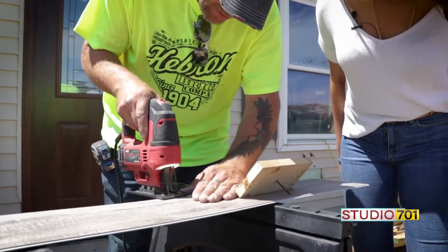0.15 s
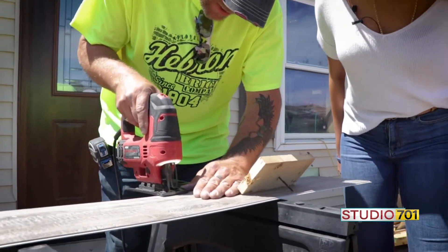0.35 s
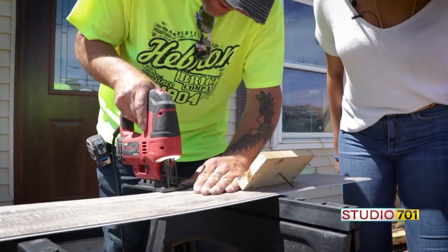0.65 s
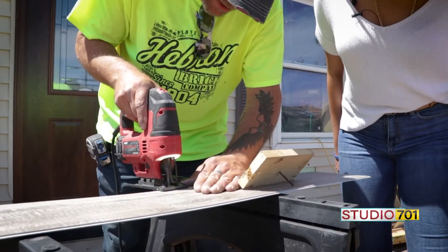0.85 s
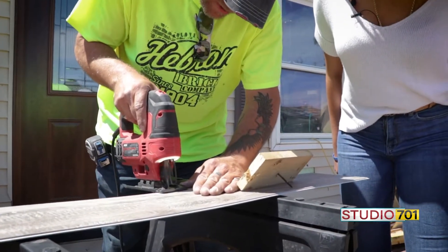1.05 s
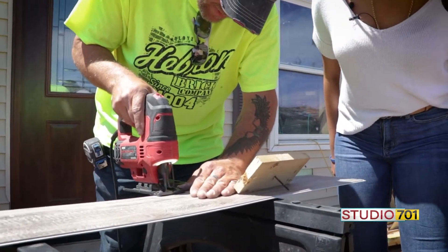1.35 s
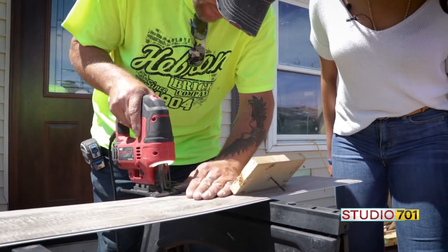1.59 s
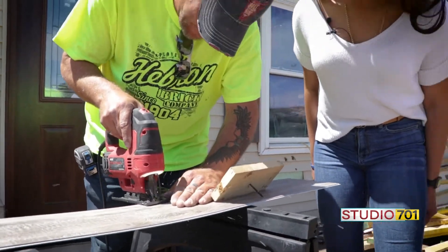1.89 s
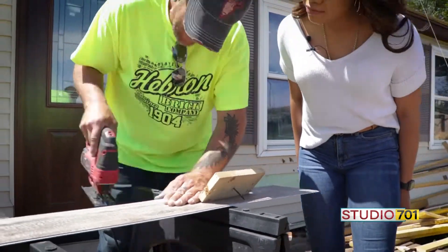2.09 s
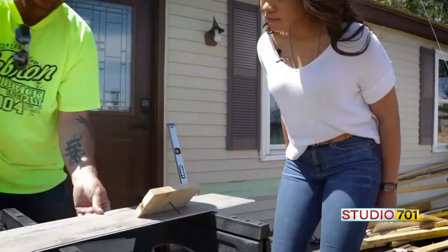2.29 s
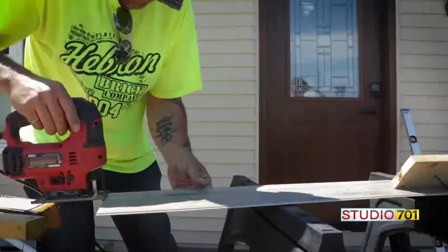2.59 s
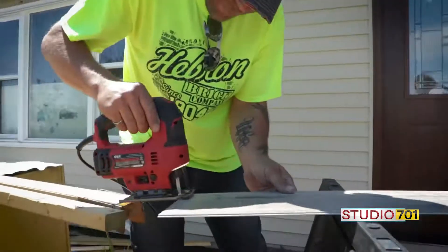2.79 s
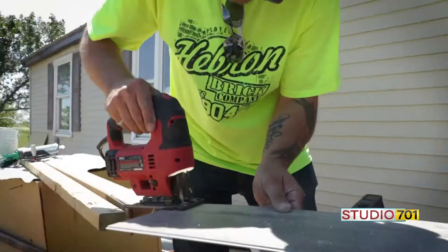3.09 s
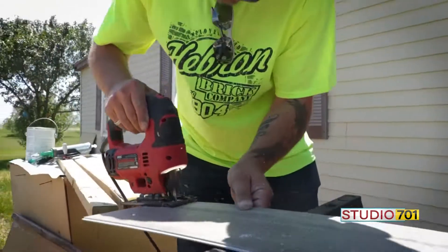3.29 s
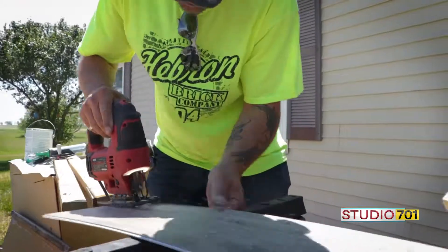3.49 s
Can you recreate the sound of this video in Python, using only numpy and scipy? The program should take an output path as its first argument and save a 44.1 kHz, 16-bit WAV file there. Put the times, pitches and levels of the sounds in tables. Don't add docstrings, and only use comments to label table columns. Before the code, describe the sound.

A jigsaw quickly gains speed and bites into a vinyl plank outdoors, a harsh chattering buzz with bright hiss until 1.8 s. It whines freely, then brakes from 2.1 to 2.4 s with a falling, rough squeal. Quiet ticks and soft thuds of handling follow. At 2.75 s the motor whines up again, with a sharp clack near 3.0 s and knocks and faint sliding from 3.2 s until the end.

```python
import sys
import numpy as np
from scipy import signal
from scipy.fft import rfft, irfft
from scipy.io import wavfile
from scipy.ndimage import uniform_filter1d, map_coordinates

SR = 44100
rng = np.random.default_rng(int(sys.argv[2]) if len(sys.argv) > 2 else 0)


def master(y):
    cut = np.clip(np.atleast_2d(y).T, -1, 1)
    pcm = np.round(cut * 32767)
    wavfile.write(sys.argv[1], SR, pcm.astype(np.int16))


def invert_db(x):
    u = np.asarray(x, float) / 20
    return 10 ** u


N = 160965
TIME_S = np.arange(N) / SR
TURNS_PER_STROKE, MESH_ORDER = 10, 5
CUT_ENDS_S, BRAKE_S, STOP_S, RESTART_S = 1.7705, 2.09, 2.37, 2.746


def level(x, db):
    return x * invert_db(db) / np.sqrt(np.mean(x ** 2))


def curve(rows, column):
    rows = np.array(rows)
    return np.interp(TIME_S, rows[:, 0], rows[:, column])


def turns_of(rows):
    return np.cumsum(curve(rows, 1)) / SR


def span(start_s, end_s):
    return np.clip(np.minimum(TIME_S - start_s, end_s - TIME_S) * 1000 + .5, 0, 1)


def colour(x, points, peaks=()):
    hz, points = np.arange(1, 4098) * SR / 8194, np.array(points)
    gain = invert_db(np.interp(np.log(hz), np.log(points[:, 0]), points[:, 1]))
    gain = gain * (1 + sum(invert_db(db) / (1 + (2 * (hz - f) / width) ** 2) for f, width, db in peaks))
    cepstrum = irfft(np.log(gain))
    cepstrum[1:4096] *= 2
    cepstrum[4097:] = 0
    return signal.fftconvolve(x, irfft(np.exp(rfft(cepstrum))))[:len(x)]


def band(x, lo_hz, hi_hz, order=2):
    return signal.sosfilt(signal.butter(order, [lo_hz, min(hi_hz, SR / 2.1)], "band", fs=SR, output="sos"), x)


def walk(rate_hz):
    k = int(SR / rate_hz)
    steps = np.repeat(rng.standard_normal(N // k + 1), k)
    return 1.3 * uniform_filter1d(uniform_filter1d(steps, k), k)[:N]


def grit(spread_db):
    return rng.standard_normal(N) * invert_db(spread_db * rng.exponential(size=N))


# pitch_hz, level_db
YARD_TONE = [(60, -15), (515, 7), (1000, 5), (1700, 0), (16000, -4)]


def yard():
    return level(colour(rng.standard_normal(N), YARD_TONE), -73) * invert_db(1.5 * walk(30))


# start_s, turns_hz, plank_level_db, hiss_level_db, mesh_level_db
CUT = [(0, 285, -42, -69, -40), (.025, 288, -41, -55, -43), (.05, 325, -40.5, -48.5, -53),
       (.08, 365, -40, -47.5, -42), (.11, 398, -39, -46.5, -37.5), (.15, 418, -38.5, -44, -34.5),
       (.2, 434, -37.5, -41.5, -35.5), (.28, 462, -37, -41, -39.5), (.34, 479, -36, -40.5, -40),
       (.47, 487, -35, -39.5, -40.5), (.56, 494, -35, -38.5, -46), (1.0, 517.3, -35, -37, -52),
       (1.4, 524, -35, -37, -51), (1.77, 523.5, -34.5, -36.5, -48)]
# pitch_hz, width_hz, level_db
PLANK_RINGS = [(2860, 400, -10), (3165, 170, -8.5)]
# pitch_hz, level_db
PLANK_BODY = [(40, -70), (300, -33.5), (700, -16), (1130, -23), (1230, -6.5), (2000, 2), (3300, 2.5),
              (4300, -15)]
# pitch_hz, level_db
CUT_HISS = [(1500, -43), (3500, 2.5), (5300, 0), (7200, -2), (9000, 2), (13300, -6), (13900, -33),
            (16000, -32)]
# pitch_hz, width_hz, level_db
BLADE_RINGS = [(7850, 370, 2), (10880, 810, 1)]


def cutting(turns):
    stroke = turns / TURNS_PER_STROKE
    pattern = map_coordinates(rng.standard_normal(840), [stroke % 1 * 840], order=3, mode="grid-wrap")

    def beat(per_stroke, db):
        return db * np.cos(2 * np.pi * per_stroke * stroke + per_stroke)

    pulse = invert_db(beat(1.0, 0.32) + beat(2, 2.1) + beat(4, 0.36) + beat(6.6, 2.6))
    bite = pulse * (level(grit(2.05), 0) + 0.71 * pattern)
    boom = band(bite, 748.4, 928, order=4)
    plank = level(colour(bite, PLANK_BODY, PLANK_RINGS), 0)
    plank = level(plank + level(boom, -14), 0)
    shudder_s, shudder_length_s = 0.46, 0.21
    loose = np.exp(-((TIME_S - shudder_s) / shudder_length_s) ** 4)
    plank = plank + loose * level(band(bite, 860, 1250), -17.5)

    tearing = pulse ** 0.5 * (level(grit(1.0), 0) + 0.067 * pattern)
    hiss = level(colour(tearing, CUT_HISS, BLADE_RINGS), 0)

    wobble = .9 * np.sin(4 * np.pi * stroke) + .3 * walk(90)
    mesh = np.sin(2 * np.pi * MESH_ORDER * turns + wobble) * (.95 + .3 * walk(450)) * pulse
    shaft = invert_db(-29.5) * np.sin(2 * np.pi * turns + 2.1 * walk(60))
    return plank * invert_db(curve(CUT, 2)) + hiss * invert_db(curve(CUT, 3)) + (mesh + shaft) * invert_db(curve(CUT, 4))


def motor(turns, orders, air, lines_db, locked, mesh_db):
    lines = 0
    for k, db in enumerate(orders, 1):
        line_db = db + mesh_db * (k in (4, 5, 8, 10))
        drift = invert_db(1.6 * walk(12))
        lines = lines + invert_db(line_db) * drift * np.sin(2 * np.pi * k * turns + 0.52 * walk(40) + k * k)
    throb_db = 3 * np.cos(2 * np.pi * turns) + np.cos(2 * np.pi * turns / TURNS_PER_STROKE) + walk(25)
    fan = level(colour(invert_db(throb_db) * grit(1.0), air), -1.6)
    return fan + locked * level(lines, lines_db)


# start_s, turns_hz, level_db
FREE = [
    (1.775, 522.7, -39),
    (1.838, 523, -38.5),
    (1.94, 512, -38.5),
    (2.08, 513, -37.5),
]
FREE_ORDERS = [-32.5, -20, -27, -15, -5.5, -12.5, -10.5, -6, -9, -11, -6, -23, -7, 2.5, 0.5, -2, -2, -8,
               -12, -10, -1, -8, -8, -4, -1, -3, 3, -1.5, -6, 4]
# start_s, level_db
FREE_MESH = [(1.775, -7), (1.86, -8), (1.9, 3), (2.08, 1.5)]
# pitch_hz, level_db
FREE_AIR = [(150, -40), (1870, -26), (2700, -17.5), (7470, -0.5), (10000, -1), (16000, -7.5)]


def free_run(coasting):
    turns_hz = curve(coasting, 1)
    speed = np.clip((turns_hz - 400) / 100, 0, 1)
    judder = invert_db(4.5 * walk(70.5) * np.clip(1 - turns_hz / 250, 0, 1))
    whine = motor(turns_of(coasting), FREE_ORDERS, FREE_AIR, -2.5, speed ** 3, curve(FREE_MESH, 1))
    worn_tone = [(1500, -25), (5000, -2.5), (9000, -5), (13000, 3), (16000, -2)]  # Hz, dB
    worn = level(colour(grit(1.5), worn_tone), 0)
    mix = whine * (0.79 + 0.52 * speed) + 1.14 * worn * (1 - speed)
    return mix * judder * invert_db(curve(coasting, 2))


# start_s, turns_hz, level_db, squeal_db
BRAKE = [
    (2.09, 513, -36.5, -80),
    (2.128, 420, -44.5, -80),
    (2.168, 315, -49, -62),
    (2.182, 290, -51, -49),
    (2.2, 262, -52, -48),
    (2.225, 215, -52.5, -64),
    (2.25, 170, -54, -56),
    (2.275, 138, -54, -64),
    (2.352, 30, -60, -95),
    (2.376, 10, -80, -95),
]


def brake(coasting):
    turns, hz = turns_of(coasting), curve(coasting, 1)
    window = np.clip((hz - 215) / 60, 0, 1) * np.clip((490 - hz) / 40, 0, 1)
    whine = np.sin(2 * np.pi * 2 * MESH_ORDER * turns + .6 * walk(200)) * window
    squeal_order, roughness_hz = 49, 700
    squeal = np.sin(2 * np.pi * squeal_order * turns + 1.6 * walk(roughness_hz)) * invert_db(2 * walk(200))
    return invert_db(-15 + curve(BRAKE, 2)) * whine + invert_db(curve(BRAKE, 3)) * squeal


def rough_contact():
    return np.tile(level(grit(2), 0) * invert_db(3 * walk(600)), 2)


# start_s, length_s, level_db, pitch_hz, width_octaves
RATTLES = [(2.1, 0.0098, -53, 2340, 0.39), (2.474, 0.019, -62.5, 660, 1.3), (2.322, 0.016, -58, 2740, 2),
           (2.336, 0.01, -59, 3360, 1.7), (2.352, 0.0058, -53, 3000, 2.1), (2.368, 0.0073, -66, 3000, 1.4),
           (2.393, 0.011, -62.5, 2700, 1.2), (2.41, .002, -62, 7500, 1), (2.419, 0.002, -51, 6960, 0.82),
           (2.4217, 0.0036, -58, 2800, 2), (2.43, 0.011, -57, 3180, 2), (2.444, 0.0032, -56, 4180, 1.6),
           (2.448, 0.0037, -57, 3000, 1.3), (2.483, 0.013, -66, 3500, 2), (2.532, 0.02, -68, 6000, 2),
           (2.549, .003, -57, 6960, 1.5), (2.553, 0.031, -49, 4960, 3.2), (2.578, .02, -69, 3980, 2.9),
           (2.58, 0.033, -79, 5040, .05), (2.633, 0.0026, -62.5, 5000, 1.6), (2.68, 0.0018, -60, 7000, 2.4),
           (2.755, 0.0038, -49.5, 3600, 1.4), (2.882, 0.0046, -52, 4200, 1), (2.956, 0.016, -47, 3070, 1.4),
           (2.97, 0.0055, -35.5, 4500, 3.1), (2.9755, 0.0056, -37, 7000, 3), (2.993, 0.012, -38.5, 4500, 3),
           (3.058, 0.044, -51, 2550, 1.1), (3.41, 0.013, -37.5, 10970, 2), (3.525, 0.031, -48.5, 4000, 3.9)]


def rattles(rough):
    out = np.zeros(N + SR)
    t = np.arange(SR // 10) / SR
    for start_s, length_s, db, hz, octaves in RATTLES:
        i = int(start_s * SR)
        swell = np.clip(0.58 + t / length_s / .5, 0, 1)
        tail_s = min(0.0059, 0.5 * length_s)
        shape = swell * np.exp(-np.clip(t - 0.62 * length_s, 0, 1) / tail_s)
        half = 2 ** (octaves / 2)
        y = band(rough[i:i + len(t)] * shape, hz / half, hz * half)
        out[i:i + len(t)] += y * invert_db(db) / np.sqrt(np.mean(y[:int(length_s * SR)] ** 2))
    return out[:N]


# start_s, level_db, pitch_hz
KNOCKS = [(2.261, -58, 400), (2.437, -58.5, 525), (2.446, -59.5, 500), (2.556, -58, 600), (2.566, -56, 706),
          (2.607, -63, 350), (2.618, -63, 500), (2.671, -68, 500), (3.078, -53, 479), (3.184, -62, 520),
          (3.209, -47, 654.4), (3.245, -52, 1002), (3.25, -47, 658), (3.259, -56, 497), (3.287, -54, 400),
          (3.319, -43, 450), (3.352, -52, 480), (3.36, -49, 590), (3.378, -43.5, 1000), (3.389, -44, 604),
          (3.403, -53, 604), (3.436, -57, 450), (3.5, -58, 483), (3.515, -47.5, 800), (3.528, -59, 505),
          (3.577, -56, 700), (3.59, -55, 520), (3.599, -45, 455)]


def knocks(rough):
    out = np.zeros(N + SR)
    t = np.arange(SR // 10) / SR
    rise_s = .0012
    push = t / rise_s * np.exp(1 - t / rise_s)
    for start_s, db, hz in KNOCKS:
        i = int((start_s - rise_s) * SR)
        scrape = level(band(rough[i // 2:i // 2 + len(t)], hz * 0.26, hz * 3.5), 0)
        y = push * np.sin(2 * np.pi * hz * t) + 0.4 * push * scrape
        out[i:i + len(t)] += band(y, 170, 3000) * invert_db(db)
    return out[:N]


# start_s, peak_db, pitch_hz
TICKS = [(2.3268, -40, 3200), (2.344, -40, 3300), (2.347, -33, 3280), (2.3512, -41, 4000),
         (2.355, -42, 3000), (2.4885, -40.5, 5200), (2.567, -36, 4100), (2.974, -25, 3500),
         (2.9762, -9.5, 9000), (2.999, -29, 5000), (3.001, -29, 7000)]


def ticks():
    out = np.zeros(N + SR)
    t = np.arange(SR // 10) / SR
    for start_s, db, hz in TICKS:
        i = int(start_s * SR)
        ring = np.cos(2 * np.pi * hz * t) * np.exp(-t * hz / 1.2)
        out[i:i + len(t)] += band(ring, hz / 4, SR) * invert_db(db)
    return out[:N]


# start_s, turns_hz, level_db, clean_line_share, plank_low_tones_db
AGAIN = [(2.746, 240, -48.5, 0.24, -20), (2.79, 468.6, -40.5, 0.49, -11), (2.82, 500, -40, 0.54, -6),
         (2.85, 515.6, -38, 0.55, -7.5), (2.9, 523, -39.5, 0.76, -3), (2.98, 515.4, -38, 0.91, 4),
         (3.02, 512, -38, 0.56, 7.5), (3.16, 509, -38, 0.77, 1.5), (3.4, 510.7, -37, 1.17, -4),
         (3.51, 507.7, -39.5, 1.35, -5.5), (3.54, 503, -36, 0.23, -13), (3.57, 515.6, -39.5, 0.77, -4),
         (3.65, 508, -40.5, 1.14, -15)]
AGAIN_ORDERS = [-21.5, -14.5, -11.5, -11.5, 2, -5, -3, -.5, -4, 1, -7, -6, -5, -5, -4, -6, -4, -1, -8, -7,
                -6, -3, -6, -8, -9, -4, -5, -7, 0, -8]
# start_s, level_db
AGAIN_MESH = [(2.75, -6), (2.88, -7), (2.92, -3), (3.02, 1), (3.65, 0.5)]
# pitch_hz, level_db
AGAIN_AIR = [(150, -52), (500, -31), (2100, -18), (2600, -9), (16000, -1)]


def restart(turns):
    whine = motor(turns, AGAIN_ORDERS, AGAIN_AIR, -7, curve(AGAIN, 3), curve(AGAIN_MESH, 1))
    low = signal.sosfiltfilt(signal.butter(3, 3130, fs=SR, output="sos"), whine)
    return (whine + (invert_db(curve(AGAIN, 4)) - 1) * low) * invert_db(curve(AGAIN, 2))


def shoe_slide():
    rub = band(rng.standard_normal(N), 316, 1390) * invert_db(2.1 * walk(150))
    return level(rub, -64) * span(3.18, 3.7)


def shoe_sing(turns):
    sing_s, length_s, sing_hz = 3.33, 0.06, 6600
    order = round(sing_hz / AGAIN[-1][1])
    tone = np.sin(2 * np.pi * order * turns) * (1 + np.cos(2 * np.pi * turns))
    return tone * invert_db(-46) * np.exp(-((TIME_S - sing_s) / length_s) ** 4)


def scene():
    coasting = list(FREE) + [row[:3] for row in BRAKE]
    again_turns = turns_of(AGAIN)
    rough = rough_contact()
    run_down = free_run(coasting) + brake(coasting) * span(BRAKE_S, STOP_S)
    second_run = restart(again_turns) + shoe_sing(again_turns)
    mono = yard() + cutting(turns_of(CUT)) * span(-1, CUT_ENDS_S)
    mono = mono + run_down * span(CUT_ENDS_S, STOP_S + 0.013)
    mono = mono + rattles(rough) + knocks(rough) + ticks()
    mono = mono + second_run * span(RESTART_S, 9) + shoe_slide()
    return np.array([mono, mono])


def roll_off(x):
    return signal.sosfilt(signal.butter(12, 16620, fs=SR, output="sos"), x)


def record(dry):
    mix = signal.sosfilt(signal.butter(1, 20, "high", fs=SR, output="sos"), dry)
    mix = signal.sosfilt(signal.ellip(12, .2, 70, 15720, fs=SR, output="sos"), mix)
    return roll_off(mix)


dry = scene()
out = record(dry)
master(out)
```